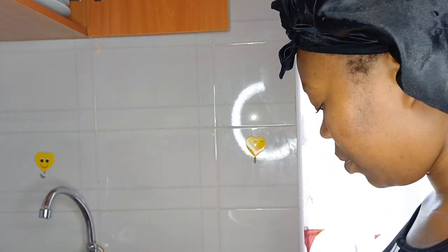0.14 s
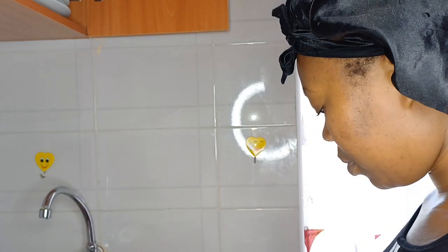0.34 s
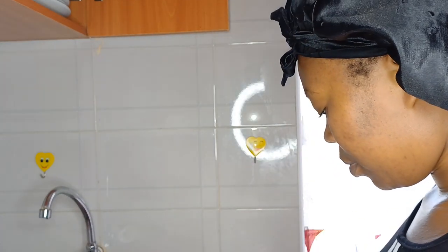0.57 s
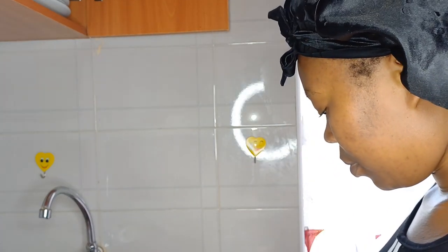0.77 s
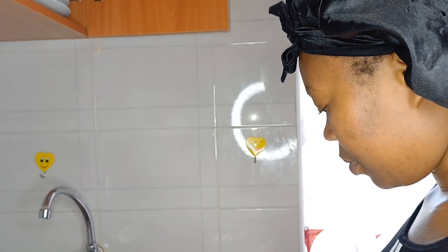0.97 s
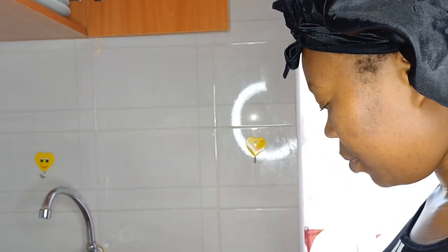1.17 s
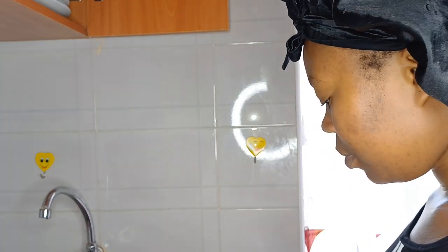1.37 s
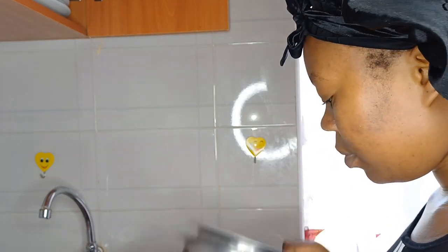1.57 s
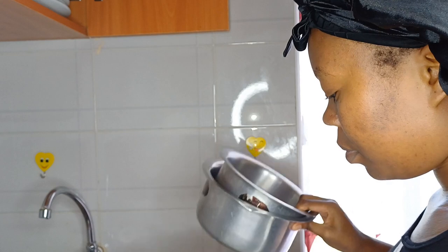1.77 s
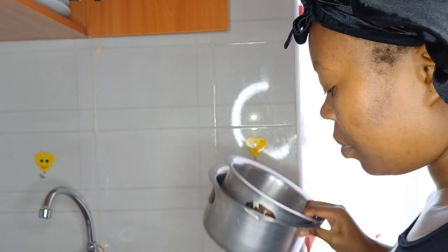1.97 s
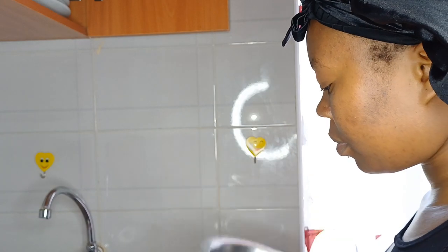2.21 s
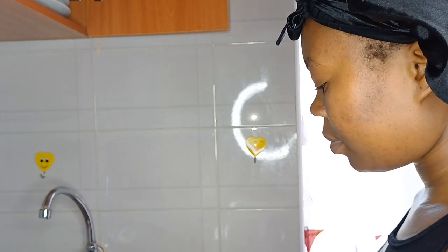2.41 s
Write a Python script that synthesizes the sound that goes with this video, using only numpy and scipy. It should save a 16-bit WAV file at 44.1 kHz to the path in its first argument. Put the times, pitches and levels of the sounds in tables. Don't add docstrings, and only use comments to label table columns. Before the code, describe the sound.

Metal pots and pans clank on a hollow worktop. After near silence, a dense run of loud boxy thuds, rattles and short pan rings fills 0.2-0.7 s. A softer double knock comes at 1.1, faint taps at 1.3-1.65, a sharp clack at 1.72. At 2.05 a pot clangs brightly, damped by 2.2; its base rubs low at 2.33-2.42. Close phone microphone, short tiled-room echo, very faint hum.

```python
import sys
import numpy as np
from scipy import signal
from scipy.fft import rfft, irfft, next_fast_len
from scipy.io import wavfile
from scipy.ndimage import uniform_filter1d

SR = 44100
rng = np.random.default_rng(int(sys.argv[2]) if len(sys.argv) > 2 else 0)


def how_loud(loudness_db):
    steps = np.asarray(loudness_db, float) / 20
    return 10 ** steps


def store_pcm(level_fs):
    pcm = np.round(np.clip(level_fs, -1, 1) * 32767).astype(np.int16)
    wavfile.write(sys.argv[1], SR, np.atleast_2d(pcm).T)


N = 108045
T = np.arange(N) / SR

# start in seconds, level in dB, centre of the modes reached in Hz.
THUDS = [(.205, -1, 396.4), (.226, -17, 426), (.247, -35.5, 370), (.287, -9.5, 370), (.343, -29.5, 370),
         (.415, 3.5, 392), (.423, -4.5, 411.2), (.438, -6, 457), (.462, -5.5, 507), (.474, -7.5, 490),
         (.503, -22.5, 450), (.533, -24, 412), (.578, -12.5, 390), (.586, -8.5, 398), (.608, -14, 430),
         (.613, -11.5, 460), (.621, -0.5, 498), (.637, -13.5, 460), (.655, -19, 467), (.675, -19, 500),
         (.987, -23.5, 400), (1.01, -20, 250), (1.1, -24.5, 130), (1.078, -11, 484), (1.098, -8.5, 495),
         (1.135, -34, 455), (1.198, -24, 412), (1.25, -29.5, 350.5), (1.33, -36.5, 324.5),
         (1.447, -30.5, 335), (1.47, -40, 250), (1.61, -37, 250), (1.716, -10, 408), (1.718, -18, 126),
         (1.72, -14.5, 75), (2.045, -5.5, 345.4), (2.085, -10, 338.7), (2.125, -17.5, 309),
         (2.34, -25.5, 130)]
# start in seconds, level in dB, centre in Hz.
SLIDES = [
    (2.265, -24, 180),
    (2.33, -6, 266),
    (2.352, -1.5, 297),
    (2.368, -7, 350),
    (2.395, -3, 274),
    (2.422, -15, 330),
]
# frequency in
# Hz, level in dB, 60 dB decay time in seconds.
WORKTOP_MODES = [(69.9, -4, 0.1), (128.8, 3, 0.3), (170, -9.5, 0.05), (250, -6.5, 0.46), (289, -2, 0.025),
                 (332.3, 0.5, 0.26), (370, 7.5, 0.15), (408, 2.5, 0.29), (449.4, 4, 0.12),
                 (470.9, 11, 0.12), (500, -3.5, 0.17), (514, -2, 0.093), (636, 4, 0.073),
                 (734, -18.5, 0.033)]
# frequency in Hz, level in dB, 60 dB decay time in seconds.
RUBBED_MODES = [(255, -2.5, 0.13), (290, 2.5, .07), (308, 4, 0.096), (354, -5, 0.054)]
# start in seconds, level in dB, rattle length in seconds, tilt in dB per octave.
CRASHES = [(.003, -50, 0.0077, -0.5), (0.201, -20, 0.01, 3.5), (0.219, -16, .01, 1),
           (0.254, -20.5, 0.005, -3), (0.293, -19, 0.0069, -1), (0.416, -18.5, 0.0092, 3),
           (0.433, -15.5, 0.013, 0.5), (.455, -19, 0.0062, -2.5), (0.59, -29, 0.01, 2.5),
           (0.612, -48.5, 0.0052, 11.5), (0.619, -17.5, 0.0053, 1.5), (0.626, -16, 0.0051, -3),
           (0.93, -54.5, 0.036, -4.5), (0.987, -43.5, 0.037, -4.5), (1.08, -31, 0.012, 1),
           (1.293, -47.5, 0.01, 0), (1.441, -66, .01, -6), (1.632, -67, 0.03, -1),
           (1.717, -3.5, 0.0027, 0.5), (2.043, -21.5, 0.0037, -3.5), (2.046, -14, 0.0047, -0.5),
           (2.067, -32.5, 0.022, -6), (2.097, -27.5, 0.018, -0.5), (2.129, -37.5, 0.012, -4.5),
           (2.199, -29, 0.0051, -0.5), (2.318, -56.5, .03, 3.5), (2.339, -47.5, .02, 0.5),
           (2.351, -44.5, 0.018, 0.5), (2.362, -40.5, .01, -3), (2.376, -33.5, 0.008, -3.5)]
# frequency in Hz, density in dB per Hz.
METAL_SPECTRUM = [(417, -6.5), (800, -7), (1300, -10.5), (2600, -13), (3300, -18.5), (4200, -14.5),
                  (11800, -21), (16000, -31.5)]
# start in seconds, level in dB, centre of the modes reached in Hz.
PAN_HITS = [(.202, -2, 1564), (.211, -7, 2820), (.222, -11.5, 2500), (.248, -12, 2170), (.283, -15, 1500),
            (.417, -17, 1223), (.440, -12, 930), (.621, -19.5, 1310), (.632, -19, 887),
            (1.462, -49.5, 1250), (1.717, -16, 1267), (2.378, -34.5, 907)]
# start in seconds, level in dB, centre in Hz.
POT_HITS = [(2.045, -6.5, 2180), (2.047, -17.5, 5000), (2.060, -3.5, 1210), (2.091, -14.5, 2720),
            (2.10, -9.5, 467), (2.112, -14, 4800), (2.125, -17, 2100), (2.135, -20, 500),
            (2.136, -16, 1900), (2.14, -21.5, 4200), (2.20, -19.5, 2500), (2.205, -27, 1200),
            (2.18, -23.5, 500)]
# start in seconds, level in dB, centre in Hz.
LID_HITS = [
    (.001, -43, 1500),
]
# start in seconds, level in dB, centre in Hz.
BOWL_HITS = [
    (1.293, -41, 1200),
    (1.46, -60, 1300),
    (1.635, -57, 4600),
    (1.652, -60.5, 4600),
]
PAN_HZ = [800, 886, 960, 1010, 1268, 1300, 1545, 1850, 2182, 2280, 2532, 2708, 2815, 3413]
POT_HZ = [512, 630, 1277.5, 1833, 1918, 2149, 2425, 2459, 2856, 3240, 3488, 3560, 3801, 4078, 4500, 4850,
          5300, 5650, 6842, 7709]
LID_HZ = [538, 856, 1345, 1450, 1665, 1864, 2310, 2433]
# level in dB, 60 dB decay time in seconds.
PAN_DECAYS = [(-12, 0.13), (-9, 0.15), (-8, 0.17), (-14, .12), (-5, 0.11), (-7.5, .12), (-17, .25),
              (-17, .14), (-5.5, 0.11), (-3, 0.13), (-8, .15), (-4.5, 0.2), (-2, 0.28), (-11.5, 0.23)]
POT_DECAYS = [(-10, 0.91), (-26, .4), (-8, 1.0), (-1, 0.19), (-0.5, 0.24), (-7.5, .25), (-15, 1.1),
              (-7, 0.48), (-7.5, 0.17), (-12, 0.23), (-9, .25), (-16, .2), (-17.5, .4), (-6, 0.089),
              (-15.5, 0.13), (-8, 0.2), (-14, 0.089), (-11, 0.12), (-18, .12), (-11.5, 0.15)]
LID_DECAYS = [(13, 0.23), (-8, .18), (-1, .3), (-10, 0.093), (-5, 0.069), (-5, 0.18), (-0.5, 0.15),
              (2, 0.15)]
# frequency in Hz, level in dB, 60 dB decay time in seconds.
BOWL_MODES = [(509.4, 19, 3.5), (792, -4, .1), (976, 3.5, 0.11), (1275, -6, 1), (1570, -7, 0.22),
              (2500, -5, 0.11), (3920, -1.5, 0.12), (4400, -1.5, .08), (4800, -1, 0.08)]
# frequency in Hz, 60 dB decay time in seconds, likeness of the ports 0-1,
# left minus right in dB.
ROOM_BANDS = [(59.8, 0.62, 0.6, 1), (250, 0.53, 0.99, 0.5), (605, 0.4, 0.6, -5.5), (1500, 0.36, 0, -3),
              (4000, 0.35, 0.06, -2.5), (9000, 0.29, 0, -5), (14000, 0.26, 0, 10)]
# frequency in Hz, density in dB per Hz.
HUM_SPECTRUM = [(20, -4.5), (130, -2.5), (300, -13.5), (600, -24), (1500, -26), (4600, -47), (16000, -42)]

THUD_REACH_OCT, RING_REACH_OCT = 0.18, 0.55
PUSH_S, LONGEST_PUSH_S, SLIDE_PUSH_S = 0.0011, 0.01, 0.02


def excite(hits, modes, reach_oct, scatter, softer=0, push_s=None):
    hz, db, t60 = np.array(modes, float).T[:, :, None]
    chance = rng.random((len(hits), 2, len(modes), 1))
    out = []
    for (s, hit_db, centre_hz), (turn, size) in zip(hits, chance):
        start = int(s * SR)
        u = T[:min(N - start, SR // 2)] + start / SR - s + 1 / SR
        reach_db = np.maximum(-6 * (np.log2(hz / centre_hz) / reach_oct) ** 2, -26)
        decay_db = -60 * u / np.maximum(t60, 0.02)
        gain = how_loud(hit_db + db + reach_db + 6 * (size - 1) + decay_db)
        detuned_hz = hz * (1 + 0.002 * (size - 0.5))
        tone = np.sum(gain * np.sin(2 * np.pi * (detuned_hz * u + scatter * turn)), axis=0)
        contact_s = push_s or min(PUSH_S * how_loud(-softer * hit_db), LONGEST_PUSH_S)
        tone = tone * (1 - np.exp(-u / contact_s))
        faded = tone * np.minimum(1, (0.5 - u) * 20)
        out.append(np.pad(faded, (start, N - start - len(u))))
    return np.array(out)


def worktop():
    blows = excite(THUDS, WORKTOP_MODES, THUD_REACH_OCT, 0.27, softer=0.5).sum(axis=0)
    slides = excite(SLIDES, RUBBED_MODES, THUD_REACH_OCT, 1, push_s=SLIDE_PUSH_S).sum(axis=0)
    return (blows + slides) * how_loud([[-9.5], [-8.5]])


def crashes():
    lead = 441
    u = T[:SR // 5]
    out = np.zeros((2, N + SR))
    for s, db, length_s, tilt_db in CRASHES:
        unevenness = how_loud(1.26 * rng.exponential(size=len(u)))
        grains = rng.standard_normal((3, len(u))) * unevenness
        envelope = np.exp(-u / max(length_s, 0.001)) * (1 - np.exp(-u / 0.00017))
        burst = (0.39 * grains[0] + grains[1:]) * envelope
        spectrum = [(hz, d + tilt_db * np.log2(max(hz, 500) / 2000)) for hz, d in METAL_SPECTRUM]
        start = int(s * SR)
        crash = colour(np.pad(burst, ((0, 0), (lead, 0))), spectrum)
        out[:, start:start + lead + len(u)] += crash * how_loud(db + 14)
    return sheet(out[:, lead:N + lead])


def sheet(x):
    sheet_db, sheet_t60_s = -1, 0.03
    u = T[:SR // 5]
    pitch, decay, level, turn = rng.random((4, 200, 1))
    hz = 1200 + 13000 * pitch ** 1.3
    fade_db = -60 * u / (sheet_t60_s * (0.5 + decay))
    phase = hz * u + turn * [[[0]], [[1]]]
    modes = np.sum(how_loud(12 * level + fade_db) * np.sin(2 * np.pi * phase), axis=1)
    modes = modes / np.sqrt(np.sum(modes[0] ** 2)) * how_loud(sheet_db)
    return x + signal.fftconvolve(x, modes, axes=1)[:, :N]


def rings():
    grip_s, grip_fade_s, grip_db = 2.182, 0.023, -10
    closing = np.clip((T - grip_s) / grip_fade_s * 4, -50, 50)
    pot = excite(POT_HITS, np.c_[POT_HZ, POT_DECAYS], RING_REACH_OCT, 0.59)
    pot[:-3] *= how_loud(grip_db / (1 + np.exp(-closing)))
    x = pot.sum(axis=0)
    for hits, modes in [(PAN_HITS, np.c_[PAN_HZ, PAN_DECAYS]),
                        (LID_HITS, np.c_[LID_HZ, LID_DECAYS]),
                        (BOWL_HITS, BOWL_MODES)]:
        x = x + excite(hits, modes, RING_REACH_OCT, 0.9).sum(axis=0)
    lag = 5
    return np.array([np.roll(x, lag), x]) * how_loud([[-1.5], [1.5]])


def colour(x, table):
    n = next_fast_len(x.shape[-1] + 4096)
    hz, db = np.array(table, float).T
    bin_hz = np.arange(n // 2 + 1) * SR / n + 1
    gain = how_loud(np.interp(np.log(bin_hz), np.log(hz), db))
    return irfft(rfft(x, n) * gain, n)[..., :x.shape[-1]]


def room(x, wet_db):
    first_s = 0.0029
    u = T[:SR // 2]
    band_hz, *columns = np.array(ROOM_BANDS).T
    tail = 0
    for hz in 45 * 2 ** np.arange(0, 8.6, 0.5):
        t60, like, pan_db = (np.interp(np.log(hz), np.log(band_hz), c) for c in columns)
        band = [(hz / 2, -60), (hz / np.sqrt(2), -9), (hz, 0), (hz * np.sqrt(2), -9), (hz * 2, -60)]
        mid, side = colour(rng.standard_normal((2, len(u))), band)
        like = np.clip(like, 0, 1)
        both = np.sqrt(1 + like) * mid + np.sqrt(1 - like) * side * np.array([[1], [-1]])
        decay_db = -60 * u / t60 + np.array([[pan_db], [-pan_db]]) / 2
        tail = tail + both * how_loud(decay_db) / np.sqrt(t60 * SR / 14)
    tail = tail * (1 - np.exp(-(u / first_s) ** 2)) * how_loud(wet_db)
    return x + signal.fftconvolve(x[1:], tail, axes=1)[:, :N]


def hum():
    noise = colour(rng.standard_normal((3, N)), HUM_SPECTRUM)
    return (noise[0] + 0.5 * noise[1:]) / noise.std() * how_loud(-65.5)


def scene():
    clatter = room(worktop(), -6.5) + room(crashes(), 4.5) + room(rings(), -4)
    low_cut = signal.butter(2, 182, 'high', fs=SR, output='sos')
    return signal.sosfilt(low_cut, clatter) + hum()


def low_pass(x):
    return signal.sosfilt(signal.butter(12, 16320, fs=SR, output="sos"), x)


def record(dry):
    gate_db, gate_slope, most_db, clip = -49, 0.62, -15, 1.04
    k = int(0.017 * SR)
    power = uniform_filter1d(uniform_filter1d(np.mean(dry ** 2, axis=0), k), k)
    level_db = 10 * np.log10(power.clip(1e-14))
    x = dry * how_loud(np.clip(gate_slope * (level_db - gate_db), most_db, 0))
    x = x / (1 + np.abs(x / clip) ** 10) ** (1 / 10)
    return low_pass(x)


dry = scene()
out = record(dry)
store_pcm(out)
```